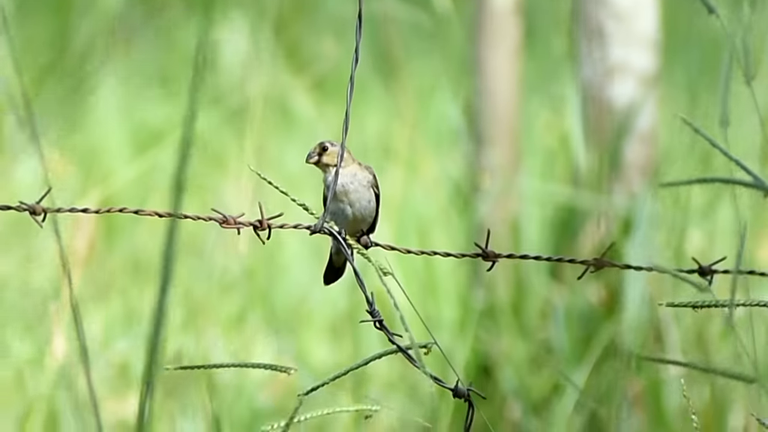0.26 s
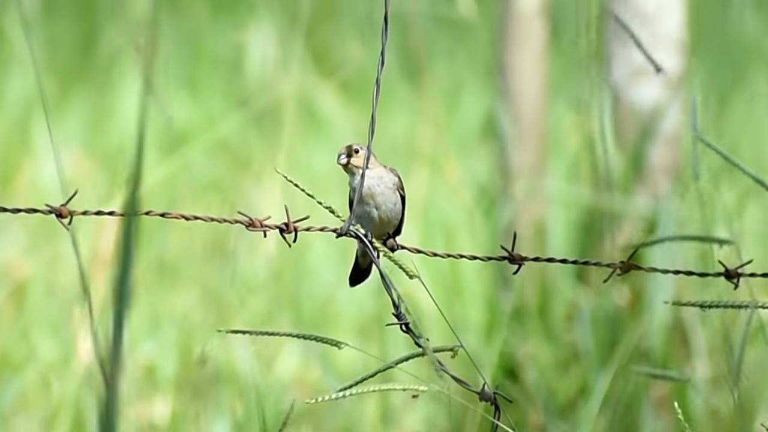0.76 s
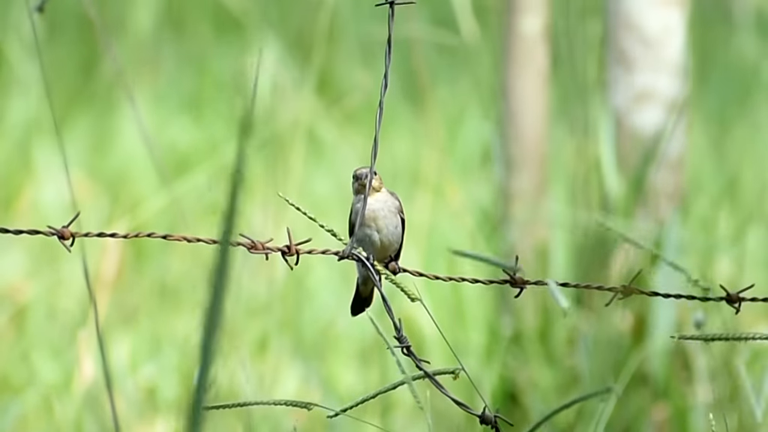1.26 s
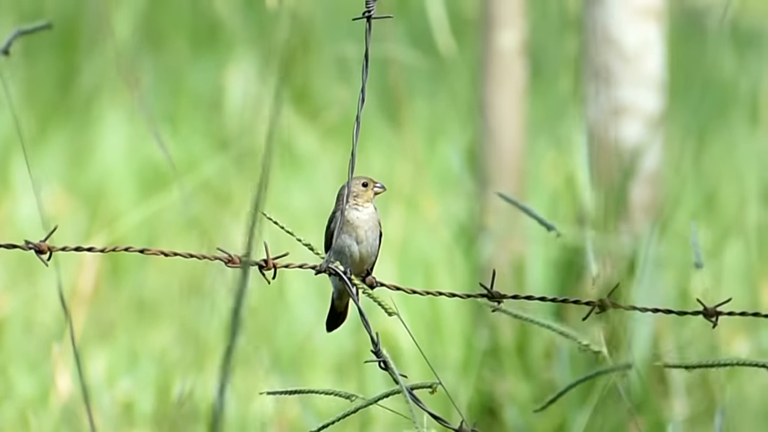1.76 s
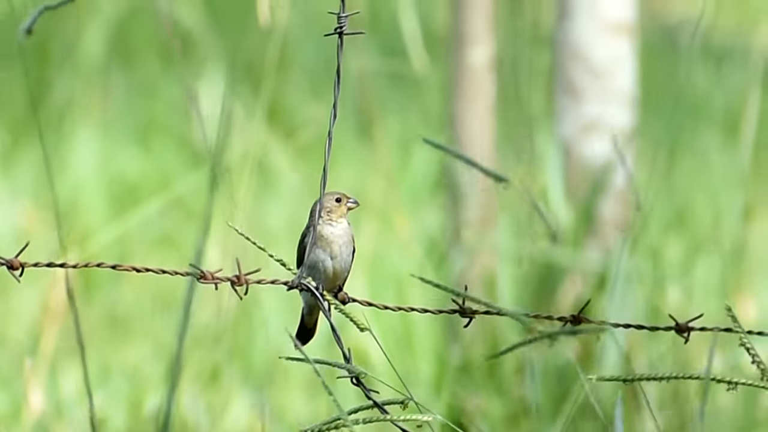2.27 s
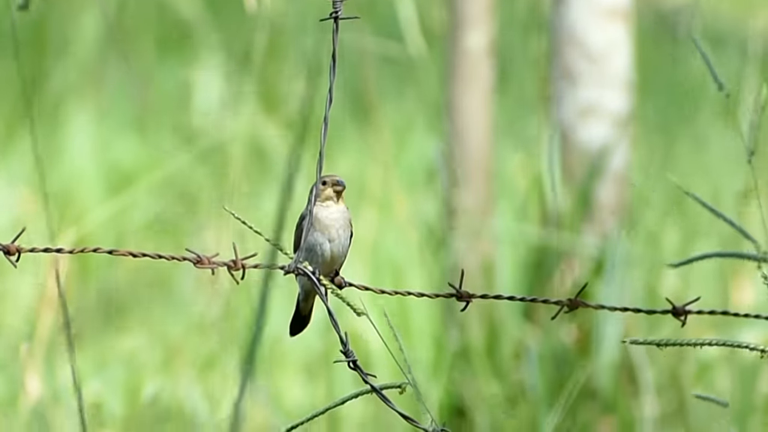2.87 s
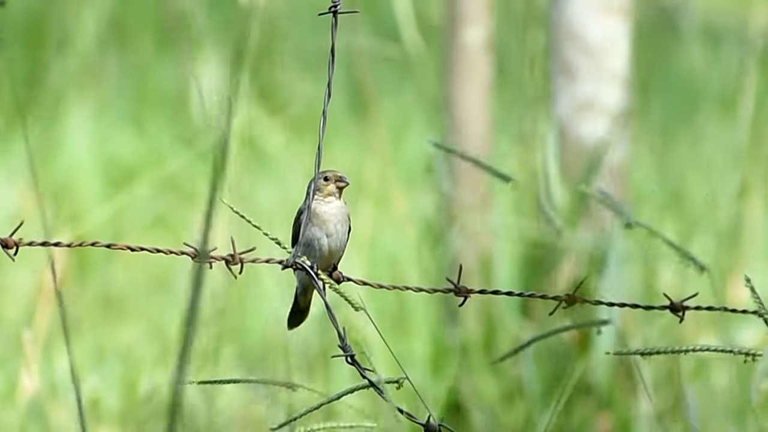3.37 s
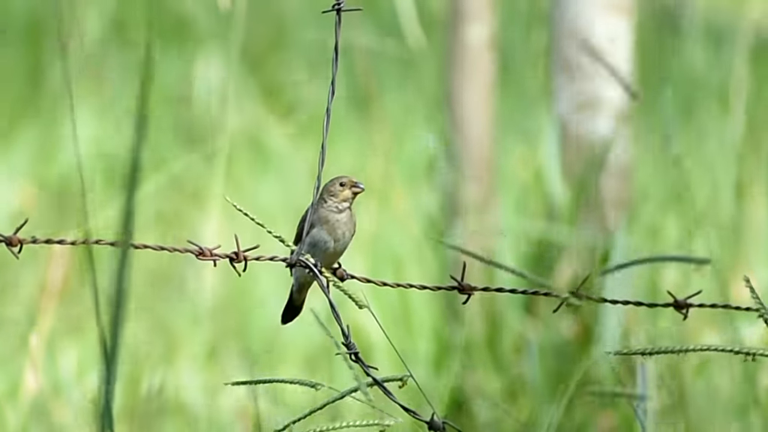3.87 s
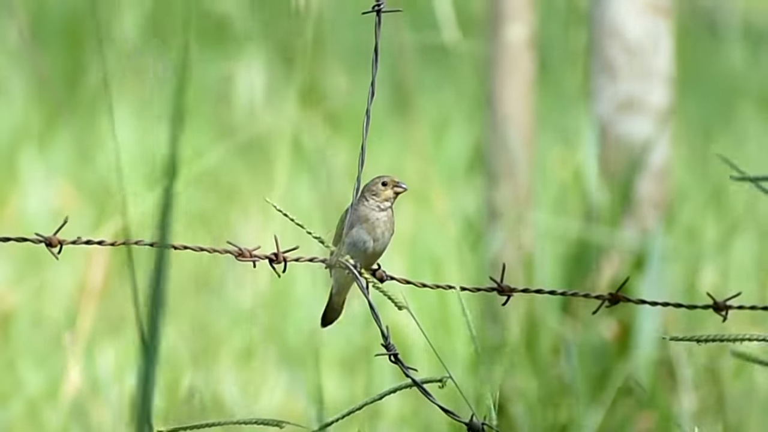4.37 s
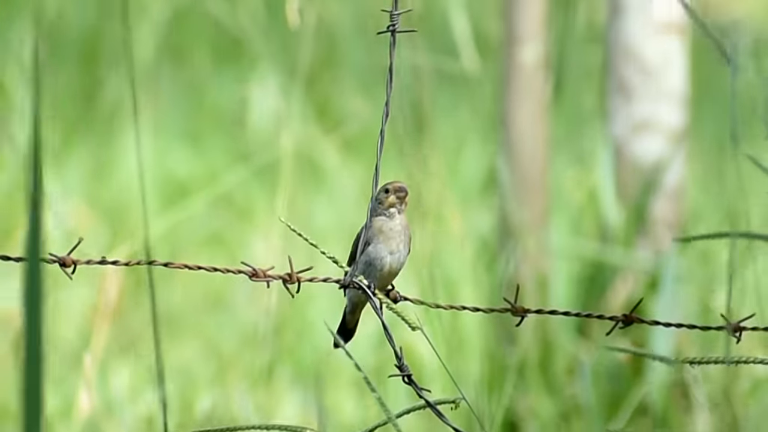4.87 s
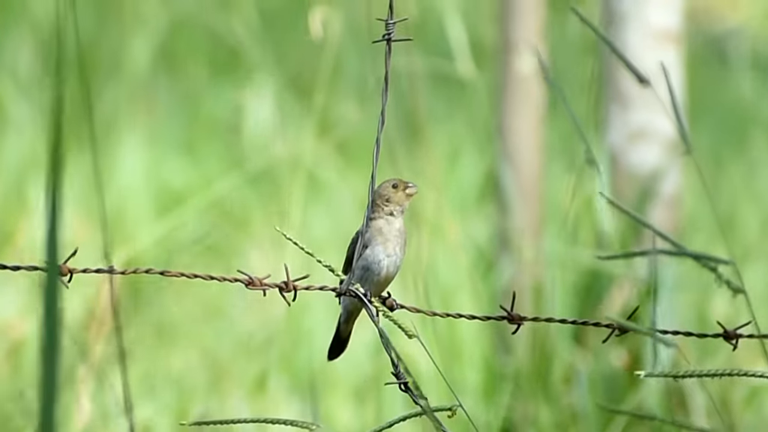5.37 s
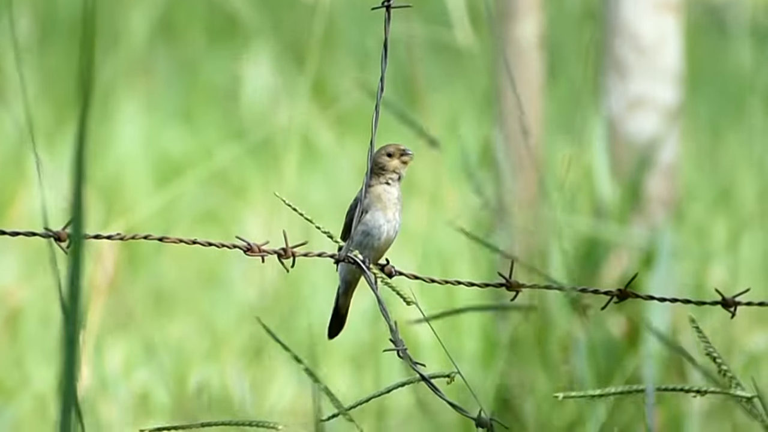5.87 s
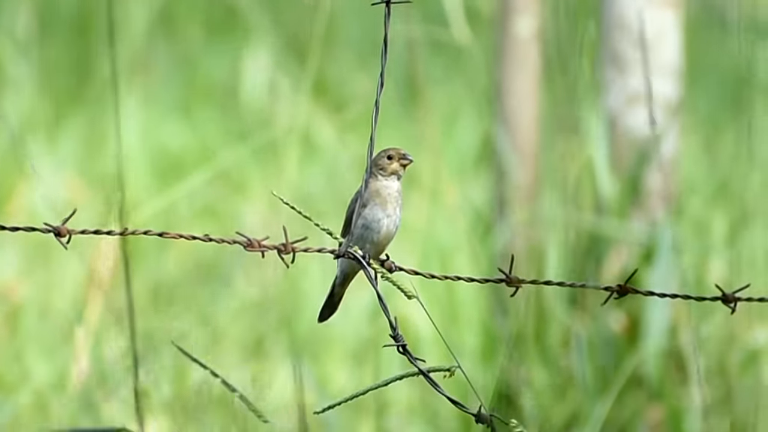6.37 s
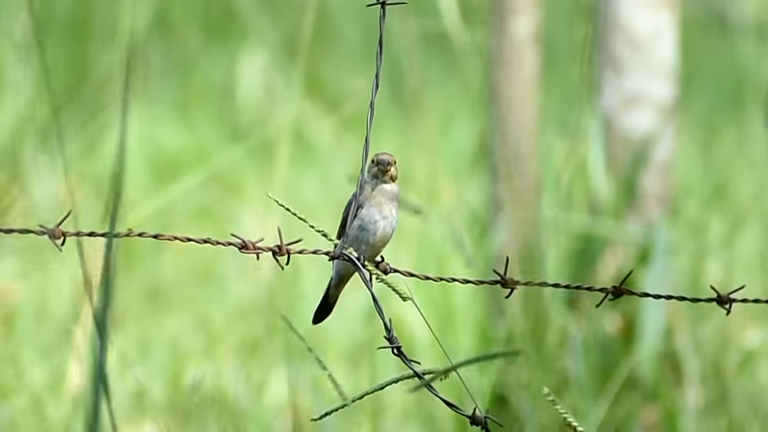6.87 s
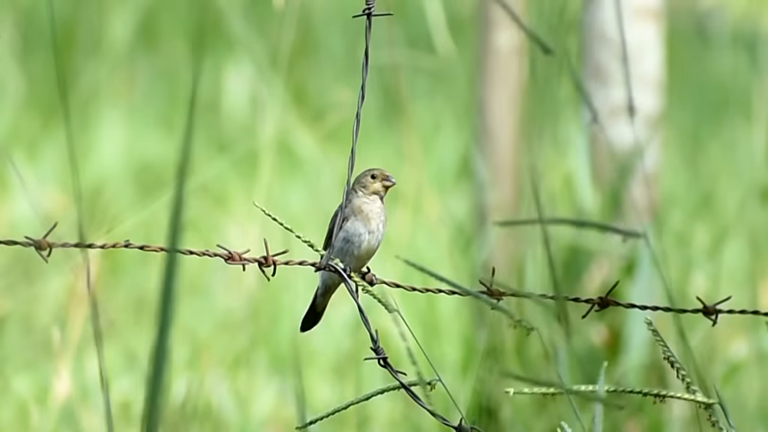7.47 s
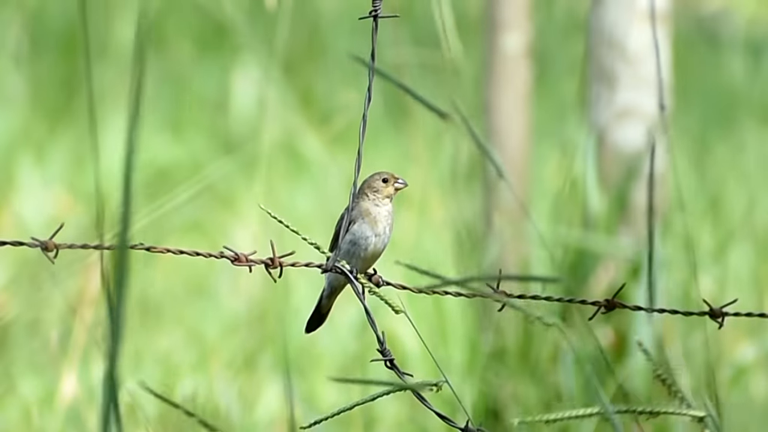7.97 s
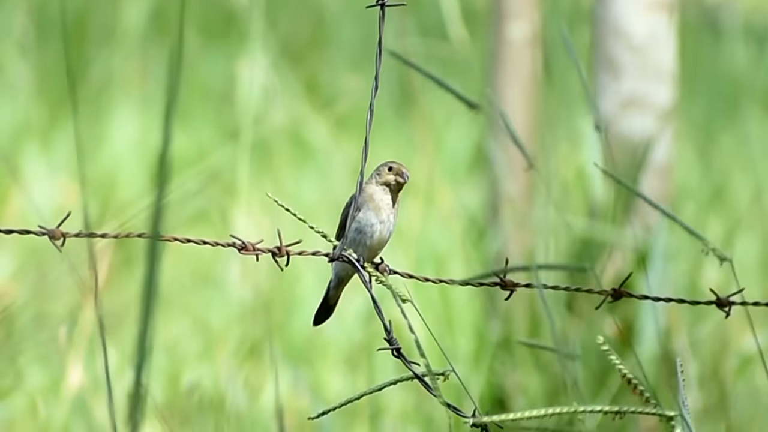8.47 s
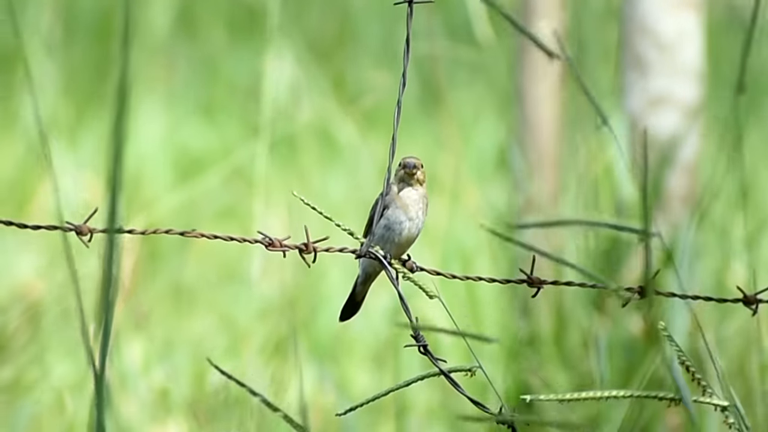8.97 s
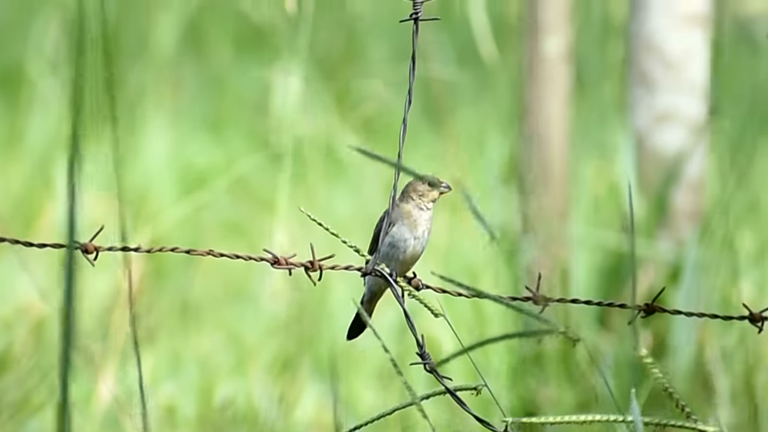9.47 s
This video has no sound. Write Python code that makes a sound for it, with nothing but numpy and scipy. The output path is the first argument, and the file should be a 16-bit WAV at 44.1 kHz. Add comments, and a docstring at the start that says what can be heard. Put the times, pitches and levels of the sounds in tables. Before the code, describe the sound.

A quiet grassland bed of low, soft rumble and airy hiss runs throughout, with a faint low drone fading in the first second. From 0.45 to 4 seconds, brief nasal bird calls of about a tenth of a second come roughly every quarter second, the clearest at 2.0. A torn, hoarse call sinks at 0.5 to 0.8. Grainy chorus chatter and piping swell around them, with tiny plinks, dry ticks and thin far whistles. From about 3.2 the background repeats in abruptly joined pieces. At 5.05 a trill begins faintly, strengthens from 5.2, and ends at 6.13: fifteen quick falling chirps, the last ones higher, lightly echoed by the surroundings. Afterwards the pulsing chorus and hiss resume, distant buzzing insects swell around 6.2 to 7.1, and very high, thin cricket chirps start at 7.6, becoming denser after 9 until the end near 9.7.

```python
"""Grassland near a camera: a small bird trills fast falling notes, another gives nasal calls and a hoarse one.
Swept sines make the trill and thin whistles; harmonics and breath noise through a throat make the calls.
Resonant noise makes a frog or insect chorus near 2 kHz, far buzzers, a drone and a cricket near 9 kHz.
Under them lies shaped noise, rumble and hiss; one short stretch of background returns, joined abruptly."""
import sys
import numpy as np
from scipy import signal
from scipy.fft import rfft, irfft, next_fast_len
from scipy.io import wavfile
from scipy.ndimage import map_coordinates

SR = 44100
rng = np.random.default_rng(int(sys.argv[2]) if len(sys.argv) > 2 else 0)


def inscribe(sig):
    """Save sig as 16-bit PCM at rate SR to the path in sys.argv[1].

    A 1-D sig is mono; a 2-D sig holds one channel per row.
    Samples are clipped to [-1, 1] before scaling.
    """
    pcm = np.round(np.clip(np.atleast_2d(sig).T, -1, 1) * 32767)
    wavfile.write(sys.argv[1], SR, pcm.astype(np.int16))


N = 428211
TIME = np.arange(N) / SR

# Falling notes of the trill: (start [s], length [s], top pitch [Hz], level before the path [dB], grace note [0/1])
TRILL_NOTES = [(5.054, 0.028, 4290, -46.5, 0), (5.116, 0.021, 4370, -46, 0), (5.196, 0.023, 4460, -33.5, 1),
               (5.255, 0.032, 4450, -39, 0), (5.344, 0.022, 4460, -29.5, 1), (5.397, 0.037, 4500, -35, 0),
               (5.487, 0.037, 4550, -29, 1), (5.545, .038, 4600, -30.5, 0), (5.641, 0.038, 4650, -26.5, 1),
               (5.704, .036, 4700, -28.5, 0), (5.801, .037, 4650, -26, 1), (5.889, .034, 5250, -25.5, 0),
               (5.955, 0.039, 5180, -26.5, 0), (6.03, 0.038, 5350, -25, 0), (6.089, .044, 5020, -29, 0)]
# Grace note: (lead [s], length [s], top pitch [Hz], end pitch [Hz], level against its note [dB])
GRACE_NOTE = (.013, .016, 4430, 3830, -8.5)
# Transmission over the grass: (frequency [Hz], gain [dB])
GRASS_PATH = [(2000, -10), (2700, -9.5), (3200, -1), (4300, -3.5), (4700, -7), (5300, -16.5)]
# Single returns from posts and trunks: (delay [s], gain [dB])
SINGLE_ECHOES = [(.0075, -8.5), (0.012, -14.5), (.021, -12.5), (.034, -14)]
# Nasal calls: (start [s], length [s], top pitch [Hz], arch depth [share], level [dB], hoarseness [0-1],
# brightness [dB per octave])
NASAL_CALLS = [(0.454, .075, 745, 0.022, -44, 0.27, -1), (1.048, 0.08, 719, 0.037, -49.5, .36, -2),
               (1.321, 0.081, 715, 0.039, -48.5, .4, -2), (1.539, .069, 660, .06, -49.5, 0.32, -7),
               (1.789, 0.098, 711, 0.039, -50, .4, -11), (2.018, 0.062, 736, .07, -35.5, .08, -9.5),
               (2.212, 0.092, 710, 0.16, -43, 0.13, -3), (2.492, .11, 688, .045, -47, 0.6, -6),
               (2.702, 0.087, 715, 0.049, -47.5, 0.32, -7), (2.951, 0.1, 700, .11, -46, 0.43, -6.5),
               (3.184, .095, 696, .09, -44, 0.26, 0), (3.423, .17, 706, 0.045, -49, .45, -2),
               (3.59, 0.095, 695, 0.024, -49.5, 0.38, -6), (3.68, 0.13, 686, .04, -45, 0.32, -5),
               (3.952, 0.093, 679, .04, -48, 0.28, -7)]
# Throat response: (frequency [Hz], gain [dB])
THROAT_RESPONSE = [(2000, 11), (3000, 5.5), (3600, 0), (4300, -3), (5500, -6), (6600, -11), (8000, -23),
                   (10000, -61)]
# One long hoarse call: (time [s], main pitch [Hz], tone level [dB], hiss level [dB])
HOARSE_CALL = [(.51, 3510, -52, -58), (.53, 3400, -41, -46), (.57, 3290, -51, -43.5),
               (.585, 3200, -47, -44.5), (.635, 3130, -43, -44.5), (.65, 2900, -46, -43),
               (.688, 2857, -37, -48), (.702, 2900, -48, -49.5), (.8, 2940, -61, -63)]
# Gliding whistles of birds further off, and short tones near 3.4 kHz from a buzzing insect: (start [s], length
# [s], start, middle and end pitch [Hz], level at the middle [dB])
GLIDING_TONES = [(.04, .09, 5400, 5000, 4200, -65), (.895, .075, 5500, 4700, 4200, -65),
                 (1.545, .02, 3900, 4500, 4600, -55), (2.47, .065, 7100, 7600, 7700, -65),
                 (3.553, 0.093, 6400, 6680, 6900, -57), (4.161, 0.081, 4200, 4600, 4220, -60),
                 (4.958, 0.073, 3440, 3430, 3370, -55), (5.69, .06, 6900, 6000, 5260, -65),
                 (6.033, 0.11, 7600, 6960, 7600, -58), (6.875, .025, 7060, 6200, 5470, -58),
                 (7.04, .08, 3450, 3450, 3400, -58), (7.37, .015, 8700, 8400, 8100, -66),
                 (9.288, 0.081, 3470, 3440, 3390, -57)]
# Two voices of a falling call: (time after start [s], pitch [Hz], level against the call [dB])
FALLING_VOICES = [
    [(0, 8700, -15), (.012, 7500, 1), (.025, 6800, -6.5), (.04, 6700, -3), (.056, 6100, -16)],
    [(.006, 9700, -7), (.025, 7900, -1.5), (.052, 7000, -1), (.07, 7300, -10.5), (.092, 6500, 4)],
]
# Falling calls: (start [s], level [dB])
FALLING_CALLS = [(0.401, -53.5), (5.646, -56.5), (6.828, -56.5)]
# Short damped notes: (start [s], level [dB], pitch [Hz])
PLINK_NOTES = [(.2443, -35, 2380), (1.7439, -35, 2100), (2.8195, -36.5, 2930), (5.1537, -41, 2730),
               (6.2173, -32.5, 2280), (6.7161, -44, 2550), (6.83, -39, 2740)]
# Cricket chirps: (start [s], level [dB])
CHIRPS = [(7.607, -61), (7.9239, -57), (8.2008, -56), (8.4682, -55), (8.747, -55.5), (8.8583, -61),
          (9.0508, -57), (9.19, -53), (9.2114, -54), (9.3232, -55), (9.3794, -63), (9.4934, -53),
          (9.508, -53.5), (9.58, -57.5), (9.6394, -59)]
# Dry ticks: (start [s], level before a common cut [dB])
DRY_TICKS = [(0.8574, -35), (1.2536, -31), (4.8584, -38), (7.9234, -48), (8.4751, -47), (8.9894, -47),
             (9.1914, -40), (9.3554, -44)]
# Broad chatter of the chorus: (time [s], level [dB])
CHATTER = [(0, -52), (.75, -50.5), (1.0, -57), (1.15, -54.5), (1.9, -51.5), (2.05, -55), (2.26, -48),
           (2.45, -55), (2.7, -49), (3.0, -61.5), (3.25, -49.5)]
# Resonances of the steady chorus: (centre [Hz], width [Hz], gain [dB])
STEADY_VOICES = [(2228, 151, 3), (2100, 170, -1), (2430, 174, -2), (2770, 244, -9)]
# Swells of a piping voice: (peak time [s], level [dB])
PIPING_SWELLS = [(.44, -46.5), (.71, -53), (1.3, -54.5), (1.87, -45.5), (3.22, -55.5)]
# Slopes of the piping swells: (rise [dB/s], fall [dB/s])
PIPING_SLOPES = (29, 82)
# Broad swell under the trill: (time [s], level [dB])
TRILL_WASH = [(5.15, -57), (5.226, -44), (5.362, -46), (6.044, -48), (6.27, -49)]
# Swells of two far buzzing insects: (peak time [s], low voice level [dB], high voice level [dB])
BUZZ_SWELLS = [(5.04, -55, -58), (6.2, -51, -61), (6.7, -56.5, -60), (6.84, -52, -55.5), (7.09, -50, -55),
               (7.79, -60, -64), (8.56, -58, -62), (9.35, -55, -62)]
# Spectrum of the rumble and hiss: (frequency [Hz], relative level [dB])
FIELD_SPECTRUM = [(65, -60), (110, -47.5), (185, -21), (247, 0.5), (317, -4), (615, -8), (1220, -12),
                  (1450, -16), (1880, -21.5), (2400, -18), (3200, -21.5), (4500, -16.5), (5660, -20.5),
                  (8570, -24), (15600, -32)]
# Left-right likeness of the rumble and hiss: (frequency [Hz], correlation [0-1])
LIKENESS = [(200, 1), (350, 1), (600, 0.98), (1200, 0.8), (1800, 0.4), (2400, 0.64), (4000, 0.53),
            (6000, 0.12), (15000, 0.046)]
# Moments at which the background stretch starts over: (time [s])
RESTARTS = [3.2455, 3.8175, 6.2288, 6.8416]
# First of three starts in a row: (time [s], lead-in [s])
TRIPLE_STARTS = [(4.2262, 0), (7.1481, .0204), (7.8428, .0204), (8.5794, .0204), (9.3957, .038)]
# Second and third start after the first: (delay [s], delay [s])
TRIPLE_DELAYS = (.1839, .3328)
# Span around the trill without repetition: (start [s], end [s])
FRESH_SPAN = (5.1933, 6.2288)
# Dips in the final spectrum: (centre [Hz], width [Hz], depth [dB])
SPECTRAL_DIPS = [(40, 85, -1.5), (1970, 48, -2.5), (3857, 138, -5.5)]

FULL_DB, END_HZ, SHALLOW_HZ_PER_DB = -25.5, 2560, 19  # a full note sinks to END_HZ, softer ones stop higher
BOUNCE_S = .002  # extra travel time of the ground bounce
EDGE_HZ, TIGHT_S, TIGHT_EDGE_HZ = 2720, 3.4, 3320  # low edge of the throat; higher from TIGHT_S on
WING_DB, WING_HZ, WING_HZ_PER_DB, OVERTONES_DB = -54.5, 8710, 60, -10  # louder chirps ring higher
PULSING_HZ = 86.2
STEADY_DB, EARLY_DB = -54, -5  # steady chorus level, and its change before the first restart
LOW_SLOPES, HIGH_SLOPES = (38, 130), (27, 110)  # buzzers: rise, fall [dB/s]
SIZZLE_S, SIZZLE_DB, SIZZLE_SLOPES = .48, -61.5, (120, 43)  # delay after a triple's start; rise, fall [dB/s]
DRONE_S, DRONE_DB_PER_S = 0.303, 8.5  # moment of the step in pitch, and the decay after it
FIELD_DB = -51.5
TOP_HZ = 15770


def amp(db):
    """Decibel law: amplitude ratio of a level."""
    return 10 ** (np.asarray(db) / 20)


def unit(x):
    """Normalization to unit root-mean-square."""
    return x / np.sqrt(np.mean(x ** 2) + 1e-20)


def along(points, hz):
    """Linear interpolation of (frequency [Hz], value) on a logarithmic frequency axis."""
    f, v = np.transpose(points)
    return np.interp(np.log(hz + 1), np.log(f + 1), v)


def curves(rows):
    """Linear interpolation in time: the sample span of a table and a curve for each column."""
    s, *cols = np.transpose(rows)
    span = slice(max(round(s[0] * SR), 0), min(round(s[-1] * SR), N))
    return span, [np.interp(TIME[span], s, c) for c in cols]


def wobble(rate, size=N):
    """Band-limited fluctuation: a smooth random curve with `rate` knots a second."""
    knots = rng.standard_normal(int(size * rate / SR) + 4)
    return unit(map_coordinates(knots, [np.arange(size) * rate / SR]))


def filtered(x, response):
    """Convolution theorem: the spectrum times a response of frequency."""
    m = next_fast_len(x.shape[-1] + 8192)
    spectrum = rfft(x, m) * response(np.fft.rfftfreq(m, 1 / SR))
    return irfft(spectrum, m)[..., :x.shape[-1]]


def bands(modes):
    """Resonance: a sum of second-order band-passes, each applied twice for steep skirts."""
    def response(f):
        return sum(amp(db) * (1j * f * w / (c * c - f * f + 1j * f * w)) ** 2 for c, w, db in modes)
    return response


def sine(hz):
    """Frequency modulation: phase is the running sum of frequency; a steady tone has unit RMS."""
    return np.sqrt(2) * np.sin(2 * np.pi * np.cumsum(hz) / SR)


def fade(size):
    """Windowing: soft ends for a call."""
    return signal.windows.tukey(size, .25)


def place(out, start_s, sound):
    """Superposition: add a sound at its start time."""
    out[round(start_s * SR):][:len(sound)] += sound


def swells(times, levels_db, slopes_db):
    """Power addition of swells that rise to a peak and fall away at constant dB a second."""
    rise, fall = slopes_db
    power = 0
    for s, db in zip(times, levels_db):
        drop_db = np.where(TIME < s, rise * (s - TIME), fall * (TIME - s))
        power = power + amp(2 * (db - drop_db))
    return np.sqrt(power)


def calling(modes, rate, lumpy_db, pulsing=0):
    """Amplitude modulation: resonant noise for small callers, uneven in loudness; an optional steady
    pulsing near 86 Hz is laid over it."""
    uneven = amp(lumpy_db * np.clip(wobble(rate), -2, 2))
    voices = filtered(rng.standard_normal(N) * uneven, bands(modes))
    phase = 2 * np.pi * np.cumsum(PULSING_HZ * (1 + 0.02 * wobble(8))) / SR
    return unit((1 + np.clip(pulsing, 0, 1) * np.cos(phase)) * voices)


def repeats():
    """Gating: true outside the span around the trill."""
    return (TIME < FRESH_SPAN[0]) | (TIME >= FRESH_SPAN[1])


def replayed(x):
    """Repetition: each restart returns to the same stretch, joined without a crossfade."""
    rows = [(s, 0) for s in RESTARTS] + TRIPLE_STARTS
    rows = rows + [(s + again, 0) for s, _ in TRIPLE_STARTS for again in TRIPLE_DELAYS]
    starts, lead = np.round(np.array(sorted(rows)).T * SR).astype(int)
    at = np.arange(N)
    # a lead-in begins just ahead of the stretch
    last = starts[np.clip(np.searchsorted(starts - lead, at, "right") - 1, 0, None)]
    fresh = (at < starts[0]) | ~repeats()
    return x[..., np.where(fresh, at, at - last + N // 2)]


def over_grass(x):
    """Comb interference: an inverted ground bounce and a few single echoes join the direct sound."""
    def response(f):
        def late(s):
            return np.exp(-2j * np.pi * f * s)
        returns = sum(amp(db) * late(s) for s, db in SINGLE_ECHOES)
        return amp(along(GRASS_PATH, f)) * (1 - 0.33 * late(BOUNCE_S) + returns)
    return filtered(x, response)


def trill():
    """Frequency sweep: each note drops fast, then flattens, with a weak third harmonic."""
    out = np.zeros(N)
    lead, *grace, under_db = GRACE_NOTE
    notes = []
    for s, length, top_hz, db, graced in TRILL_NOTES:
        notes.append((s, length, top_hz, END_HZ + SHALLOW_HZ_PER_DB * (FULL_DB - db), db))
        if round(graced):
            notes.append((s - lead, *grace, db + under_db))
    for s, length, top_hz, end_hz, db in notes:
        u = np.linspace(0, 1, round(length * SR))
        hz = end_hz + (top_hz - end_hz) * (1 - u) ** 1.3
        swell = np.abs(np.sin(np.pi * u ** 0.47)) ** 0.44
        level = amp(db + 2.5 * wobble(150, size=len(u)))
        place(out, s, level * swell * (sine(hz) + amp(-23.5) * sine(3 * hz)))
    return over_grass(out)


def nasal():
    """Source-filter principle: harmonics 3 to 13 and breath noise pass the throat as the pitch arches."""
    out = np.zeros(N)
    for s, length, top_hz, arch, db, hoarse, bright_db in NASAL_CALLS:
        hoarse = np.clip(hoarse, 0, 1)
        edge_hz = EDGE_HZ if s < TIGHT_S else TIGHT_EDGE_HZ

        def throat(f):
            tilt_db = bright_db * np.log2((f + 1) / 3300)
            return amp(along(THROAT_RESPONSE, f) + tilt_db) / (1 + (edge_hz / (f + 1)) ** 16)

        u = np.linspace(-1, 1, round(length * SR))
        hz = top_hz * (1 - arch * (u - .1) ** 2)
        shaken = hz * (1 + .032 * hoarse * wobble(120, size=len(u)))
        stack = sum(throat(k * hz) * amp(2.5 * wobble(40, size=len(u))) * sine(k * shaken)
                    for k in range(3, 14))
        breath = filtered(rng.standard_normal(len(u)), lambda f: throat(f) ** 0.54)
        swell = (1 - u ** 2) ** 0.9 * amp(1.4 * u + 2.6 * hoarse * wobble(70, size=len(u)))
        # hoarseness trades harmonic power for breath power
        voice = np.sqrt(1 - hoarse) * unit(stack) + np.sqrt(hoarse) * unit(breath)
        place(out, s, amp(db) * swell * voice)
    return out


def rasp():
    """Random frequency modulation: a torn, sinking tone with broad resonant hiss above it."""
    out = np.zeros(N)
    span, (hz, db, hiss_db) = curves(HOARSE_CALL)
    size = len(hz)
    torn_hz = hz * (1 + .035 * wobble(355, size=size))
    tone = unit(sine(torn_hz) * amp(2.3 * wobble(69.4, size=size)))
    modes = [(3920, 1000, 15), (4610, 780, 14), (5900, 1160, 13), (6600, 1000, 7), (7400, 380, -6)]
    hiss = unit(filtered(rng.standard_normal(size), bands(modes)))
    hiss = filtered(hiss, lambda f: 1 / (1 + (f / 8300) ** 12))
    hiss_level = amp(hiss_db + 1.6 * wobble(124, size=size))
    out[span] = fade(size) * (amp(db) * tone + hiss_level * hiss)
    return out


def whistles():
    """Pure tones: gliding sines of birds further off, among them two-voiced falling calls, and short tones near
    3.4 kHz from a buzzing insect."""
    out = np.zeros(N)
    for s, length, *bend_hz, db in GLIDING_TONES:
        u = np.linspace(-1, 1, round(length * SR))
        hz = np.polyval(np.polyfit([-1, 0, 1], bend_hz, deg=2), u)
        level = amp(db - 6 * u ** 2 + 3.5 * wobble(120, size=len(u)))
        place(out, s, level * fade(len(u)) * sine(hz))
    for s, call_db in FALLING_CALLS:
        for voice in FALLING_VOICES:
            span, (hz, db) = curves(np.add(voice, [s, 0, call_db]))
            out[span] += amp(db + 2.9 * wobble(92, size=len(hz))) * fade(len(hz)) * sine(hz)
    return out


def plinks():
    """Damped oscillation: brief notes out of the chorus decay 60 dB in 39 ms."""
    out, t = np.zeros(N), TIME[:SR // 20]
    for s, db, hz in PLINK_NOTES:
        onset = 1 - np.exp(-t / 0.00041)
        place(out, s, amp(db - 60 * t / 0.039) * onset * np.sin(2 * np.pi * hz * t))
    return out


def cricket():
    """Stridulation: uneven scrapes drive wing resonances and three random higher ones, then die away."""
    out, t = np.zeros(N + SR), TIME[:SR // 8]
    for s, db in CHIRPS:
        hz = WING_HZ + WING_HZ_PER_DB * (db - WING_DB) + rng.normal(0, 90)
        scrapes = rng.standard_normal(len(t)) * amp(2.1 * wobble(214, size=len(t)))
        wing = unit(filtered(scrapes, bands([(hz, 450, 0), (hz - 400, 300, -6)])))
        over = [(c, 500, 0) for c in rng.uniform(10200, 15000, 3)]
        ring = unit(filtered(scrapes, bands(over)))
        wing += amp(OVERTONES_DB + rng.normal(0, 3)) * ring
        envelope = amp(db - 60 * t / 0.21) * (1 - np.exp(-t / 0.0026)) * (t < .06 + .02 * rng.random())
        place(out, s, envelope * wing)
    return out[:N]


def ticks():
    """Random phase modulation: a 2 ms dying tone at 6.5 kHz, roughened to a dry tick."""
    out, t = np.zeros(N), TIME[:SR // 500]
    for s, db in DRY_TICKS:
        phase = 2 * np.pi * 6500 * t + 0.9 * rng.standard_normal(len(t))
        place(out, s, amp(db - 3.5 - 60 * t / .002) * np.sin(phase))
    return out


def echoes(x, t60):
    """Diffuse scattering: grass, posts and trees return a decaying noise tail, part of it unlike left-right."""
    t = TIME[:SR // 3]
    tail = rng.standard_normal((2, len(t))) * amp(-60 * t / t60) * (t > .0015)
    tail = tail[0] + 0.39 * tail[1] * np.array([[1], [-1]])
    return signal.fftconvolve(x[None], tail / np.linalg.norm(tail[0]), axes=1)[:, :N]


def chorus():
    """Superposed resonators: chatter and piping, a steady repeating chorus near 2.2 kHz, a swell under the trill."""
    steady = unit(replayed(calling(STEADY_VOICES, 30, lumpy_db=1.8, pulsing=0.62)))
    level = amp(STEADY_DB + EARLY_DB * (TIME < RESTARTS[0]))
    out = level * steady * (TIME > 1.9) * repeats()
    span, (chatter_db,) = curves(CHATTER)
    modes = [(2417, 390, 0.18), (2670, 450, 0.027), (2945, 140, -1.2)]
    chatter = calling(modes, 29.7, lumpy_db=3.5, pulsing=0.33)
    out[span] += amp(chatter_db) * chatter[span]
    piping = calling([(2053, 110, 0)], 29.8, lumpy_db=2.5)
    out += swells(*np.transpose(PIPING_SWELLS), PIPING_SLOPES) * piping
    span, (wash_db,) = curves(TRILL_WASH)
    wash = calling([(2085, 105, 0), (2400, 1060, 0)], 30, lumpy_db=3.0, pulsing=0.36)
    out[span] += amp(wash_db) * wash[span]
    return filtered(out, lambda f: np.clip((f - 1990) / 60, .1, 1))  # little of it lies under 2 kHz


def buzzers():
    """Amplitude envelopes: two far buzzing insects swell, and a thin sizzle follows each triple start."""
    peaks, low_db, high_db = np.transpose(BUZZ_SWELLS)
    low = calling([(3430, 210, 1.5), (3660, 420, 0.5)], 30, lumpy_db=2.6, pulsing=0.35)
    high = calling([(4170, 820, 0)], 100, lumpy_db=4.0)
    out = swells(peaks, low_db, LOW_SLOPES) * low + swells(peaks, high_db, HIGH_SLOPES) * high
    sizzle_peaks = [s + SIZZLE_S for s, _ in TRIPLE_STARTS]
    sizzle = calling([(4500, 300, 0)], 100, lumpy_db=3)
    return out + swells(sizzle_peaks, [SIZZLE_DB] * len(sizzle_peaks), SIZZLE_SLOPES) * sizzle


def drone():
    """Exponential decay: a low far band gives way to two higher ones that die slowly."""
    before = amp(-54.5) * calling([(390, 110, 0)], 12, lumpy_db=1.0)
    after = amp(-51.5) * calling([(640, 165, 0)], 11.6, lumpy_db=0.4)
    after += amp(-53.5) * calling([(995, 540, 0)], 11.6, lumpy_db=0.4)
    since = TIME - DRONE_S
    after *= np.clip(since / .015 + 1, 0, 1) * amp(-DRONE_DB_PER_S * np.abs(since))
    return np.clip(.5 - since / .04, 0, 1) * before + after


def field():
    """Partial correlation: far rumble and hiss as shaped noise, near mono in the bass."""
    def mid_side(hz):
        turn = np.arccos(np.clip(along(LIKENESS, hz), -1, 1)) / 2
        return amp(along(FIELD_SPECTRUM, hz)) * [np.cos(turn), np.sin(turn)]
    mid, side = filtered(rng.standard_normal((2, N)), mid_side)
    return amp(FIELD_DB) * replayed(unit(np.array([mid + side, mid - side])))


def background():
    """Superposition: rumble and hiss, the chorus, the buzzers, the drone and two quiet resonances."""
    puffs = amp(-69.5) * replayed(calling([(1265, 260, 0)], 6.3, lumpy_db=3.5))
    rumble = amp(-61) * unit(replayed(calling([(325, 59, 0)], 9, lumpy_db=2.5)))
    rumble *= (TIME >= RESTARTS[0]) & repeats()  # only the repeated stretch has this extra rumble
    return field() + chorus() + puffs + rumble + buzzers() + drone()


def scene():
    """Superposition of direct and scattered sound; the cricket leans left, the background slightly so."""
    song = trill()
    others = nasal() + rasp() + whistles() + plinks()
    chirps = filtered(cricket() + ticks(), lambda f: f / (f + 1500))
    out = song + amp(-7.5) * echoes(song, 0.29)
    out = out + others + amp(-4.5) * echoes(others, .19)
    out = out + chirps * amp([[.8], [-.8]]) + amp(-5) * echoes(chirps, 0.35)
    return out + background() * amp([[.2], [-.2]])


def record(dry):
    """Linear filtering: a bass cut and two narrow dips; the camera keeps nothing above its band limit."""
    def response(hz):
        dips_db = sum(db * np.exp(-((hz - c) / w) ** 2) for c, w, db in SPECTRAL_DIPS)
        return amp(dips_db) * (hz < TOP_HZ)
    return filtered(dry, response)


dry = scene()
out = record(dry)
inscribe(out)
```